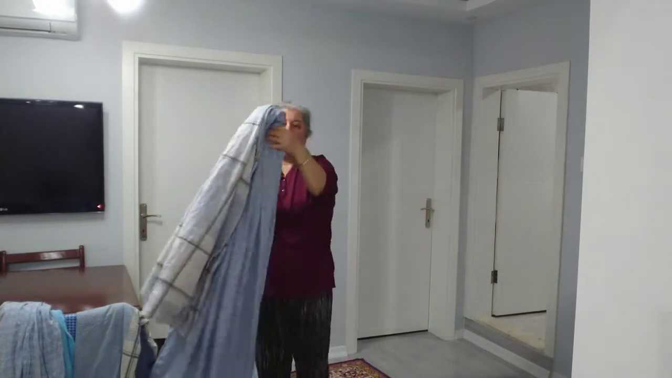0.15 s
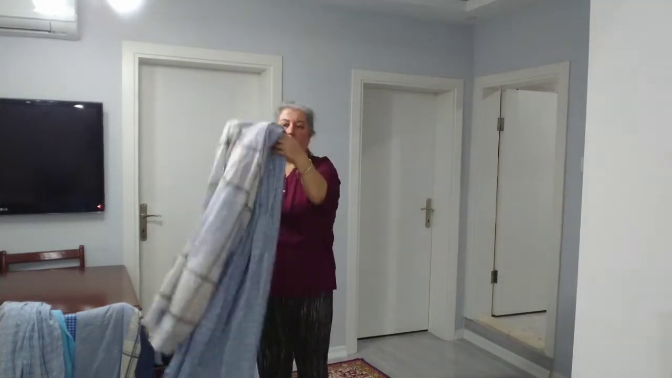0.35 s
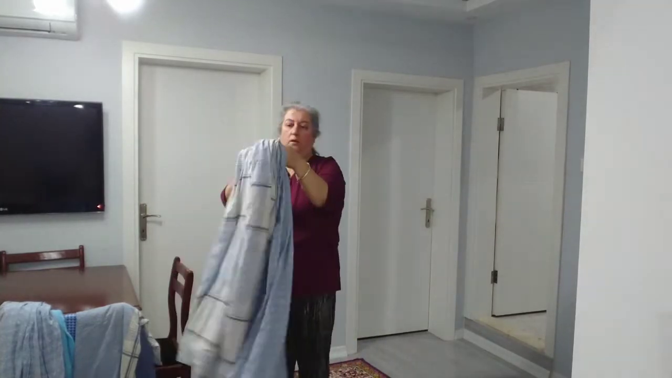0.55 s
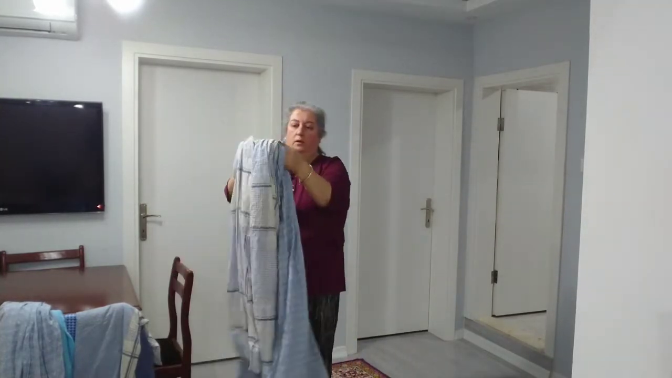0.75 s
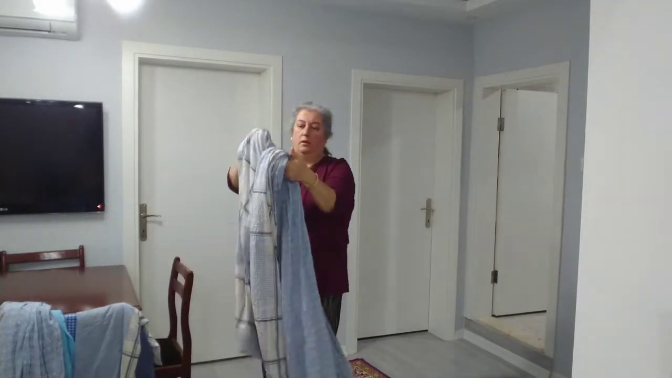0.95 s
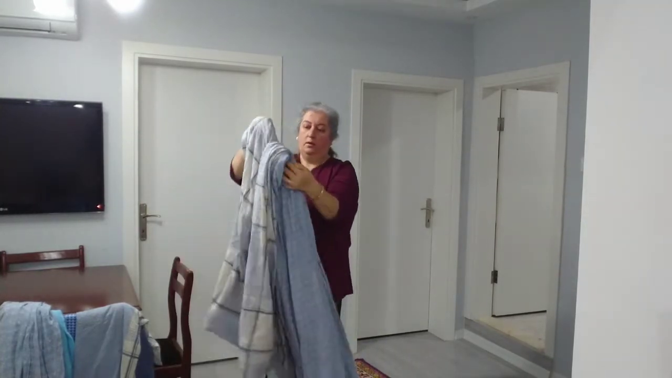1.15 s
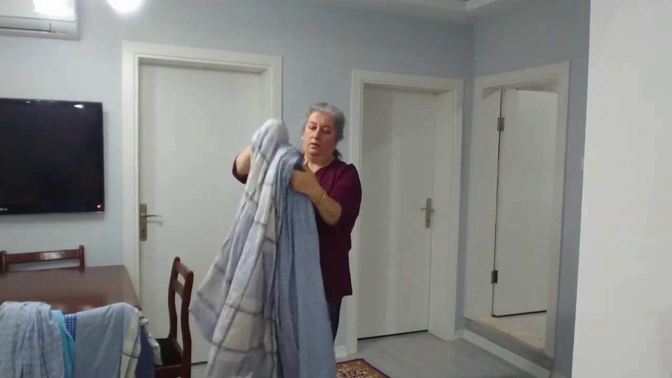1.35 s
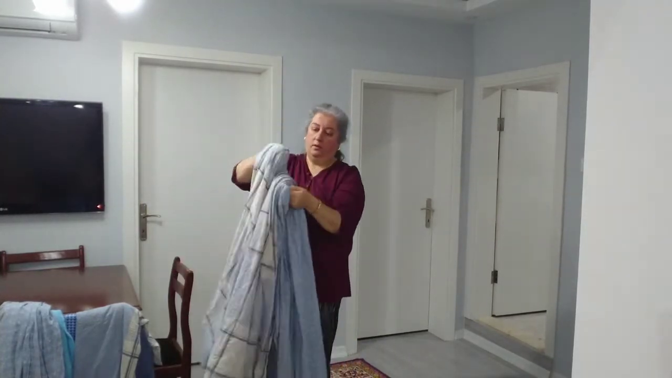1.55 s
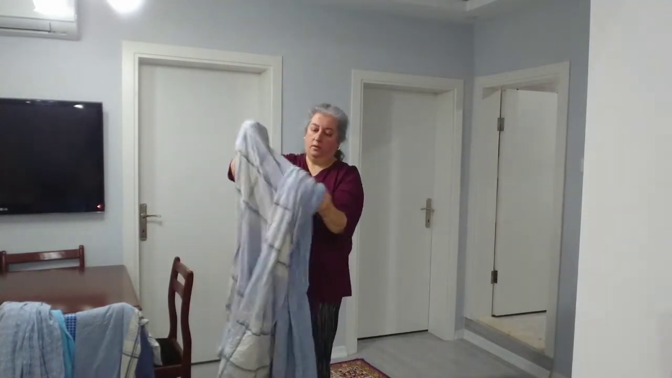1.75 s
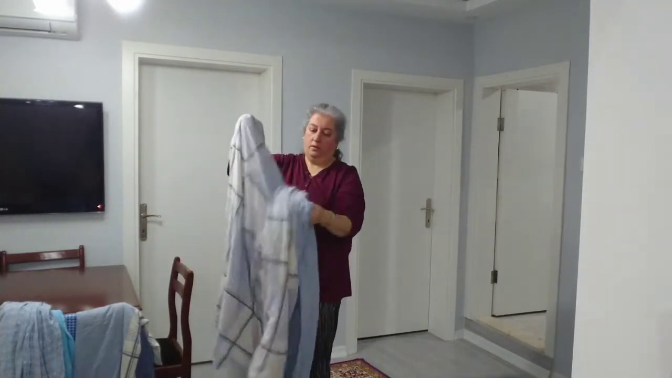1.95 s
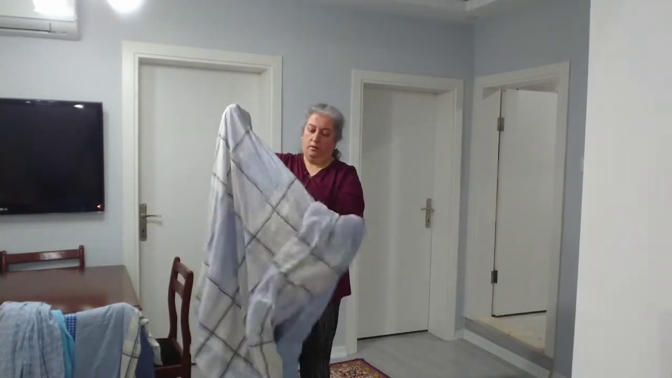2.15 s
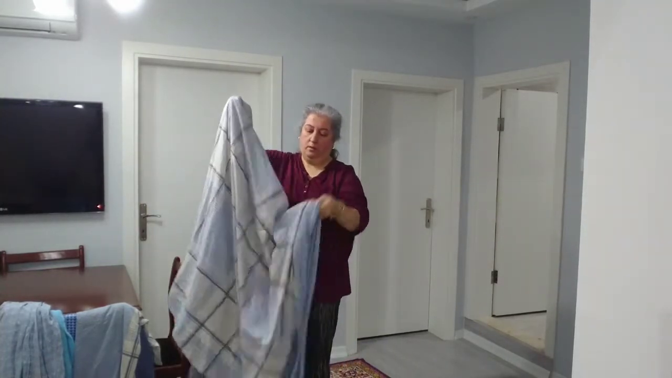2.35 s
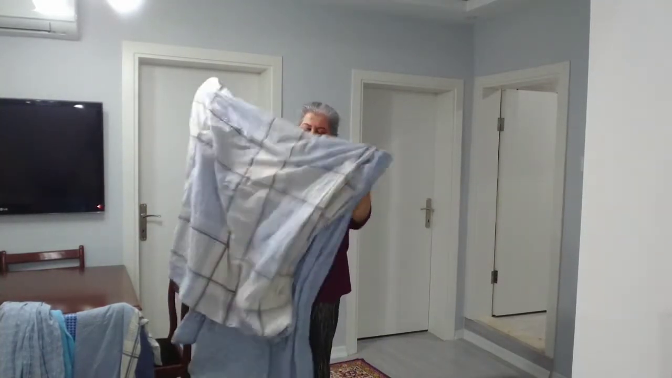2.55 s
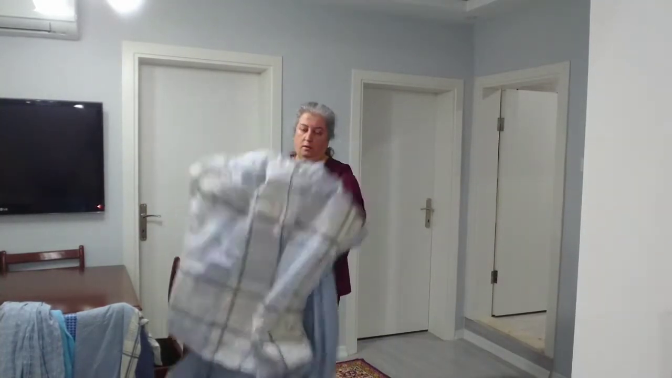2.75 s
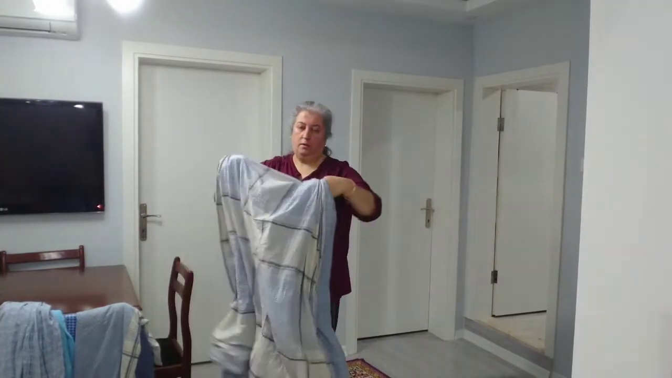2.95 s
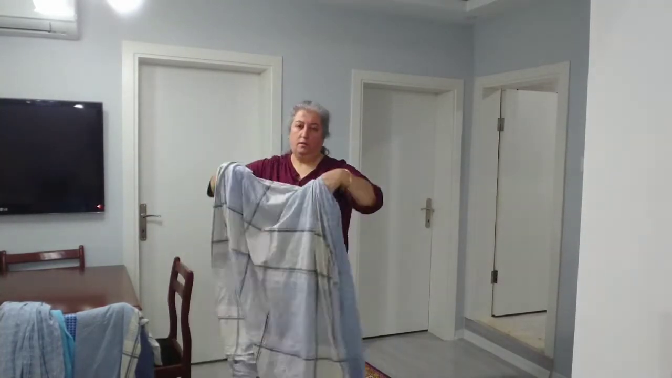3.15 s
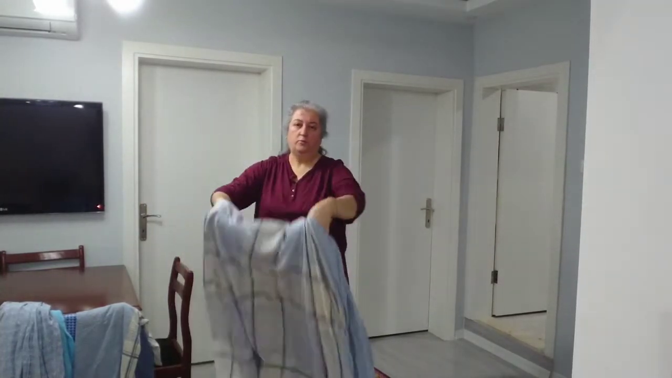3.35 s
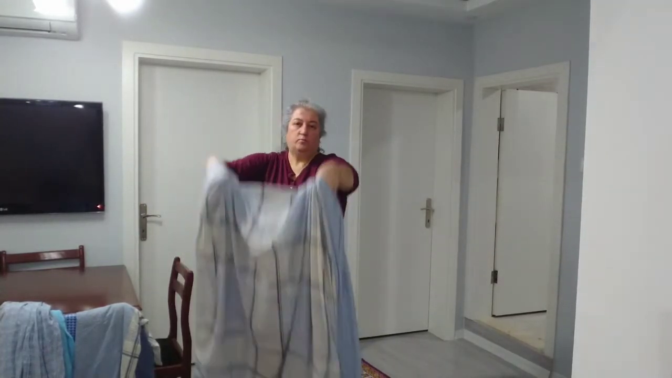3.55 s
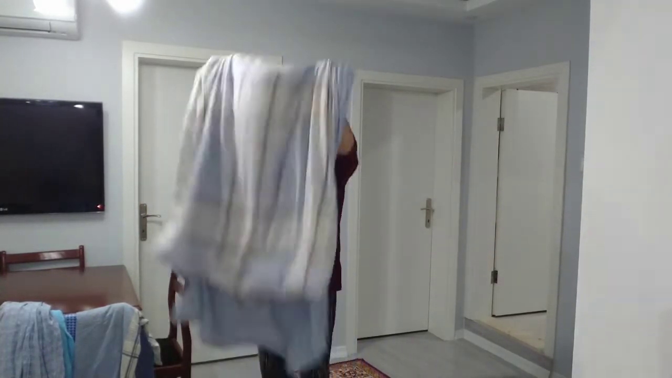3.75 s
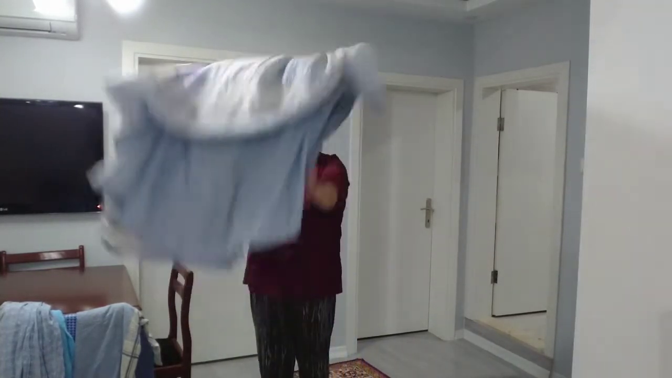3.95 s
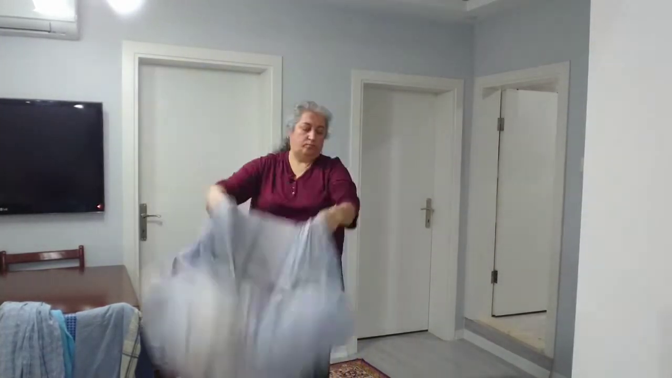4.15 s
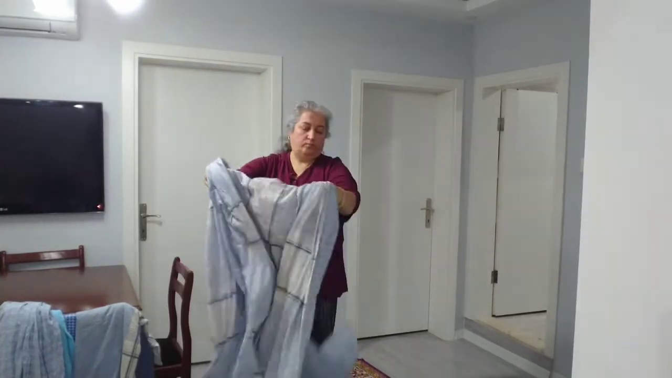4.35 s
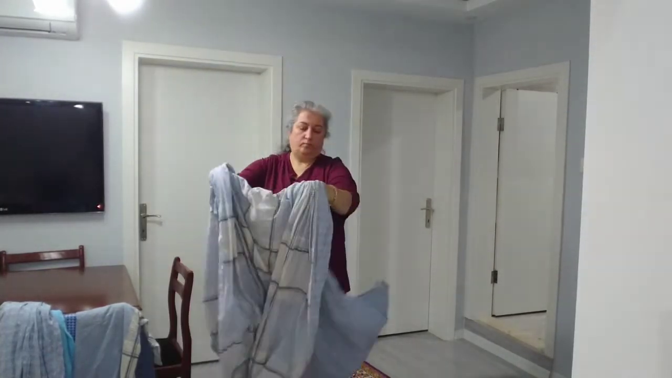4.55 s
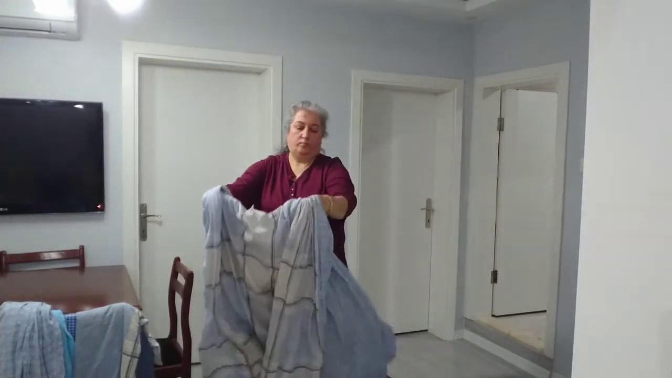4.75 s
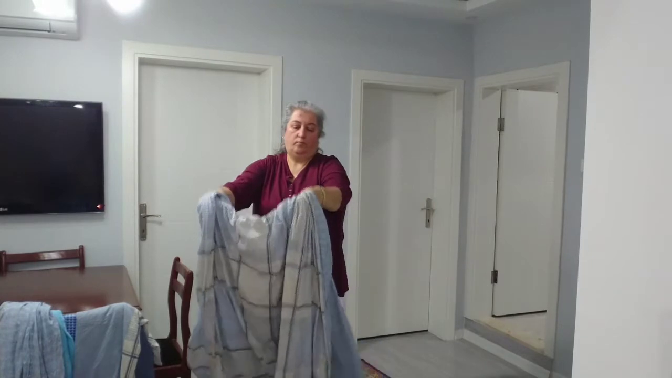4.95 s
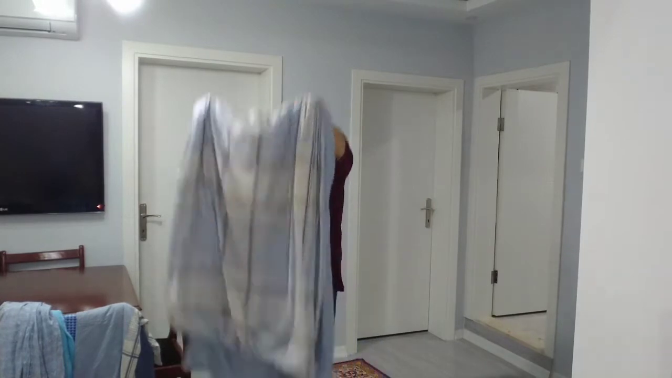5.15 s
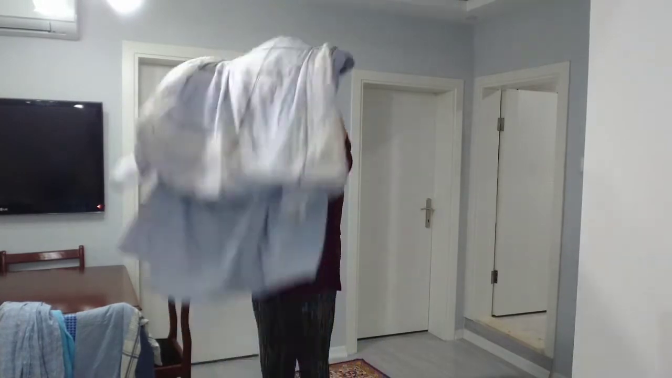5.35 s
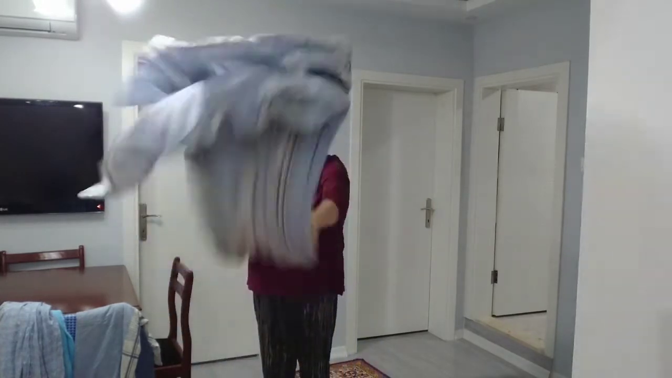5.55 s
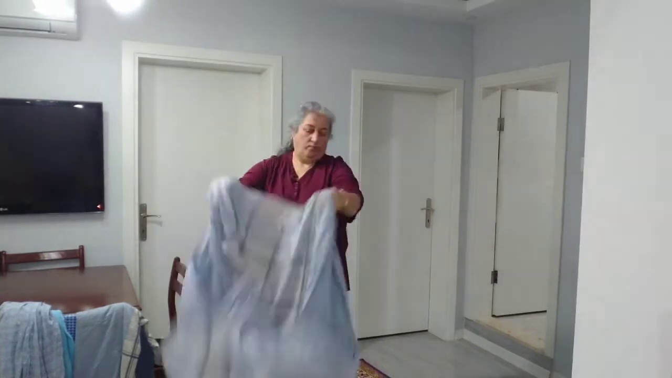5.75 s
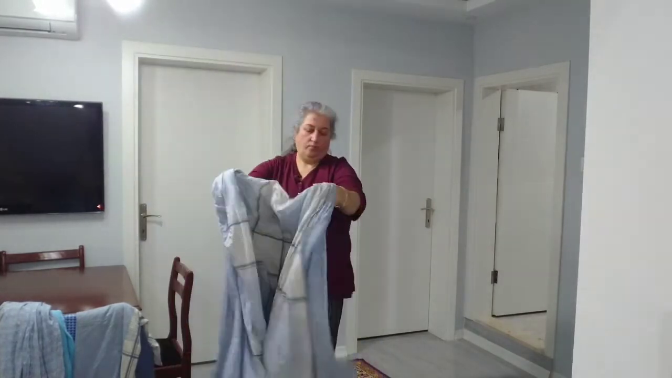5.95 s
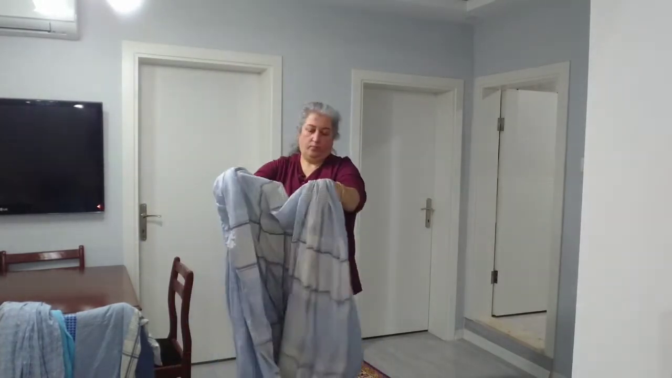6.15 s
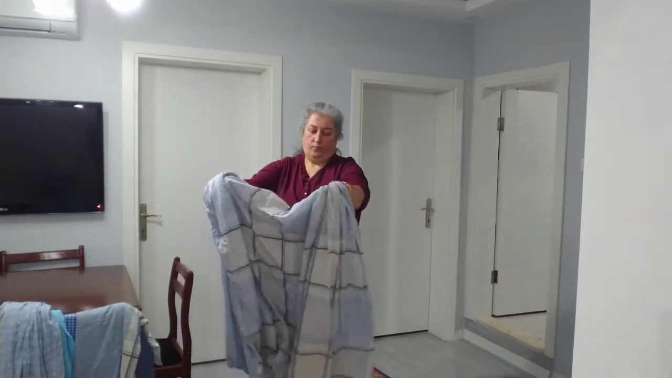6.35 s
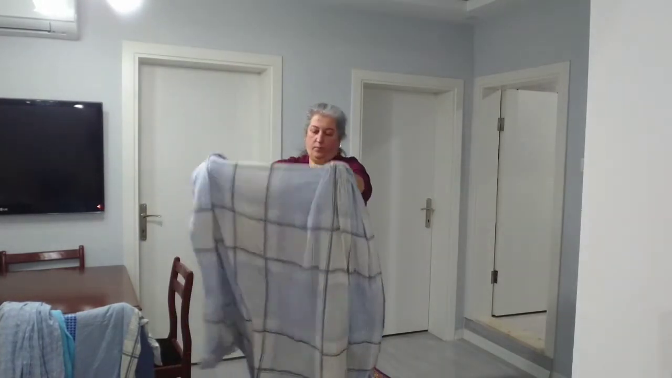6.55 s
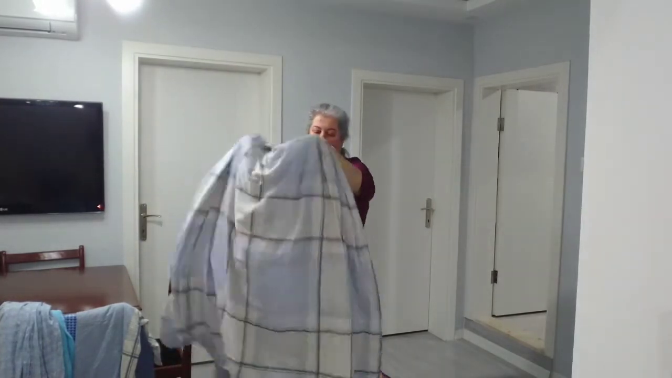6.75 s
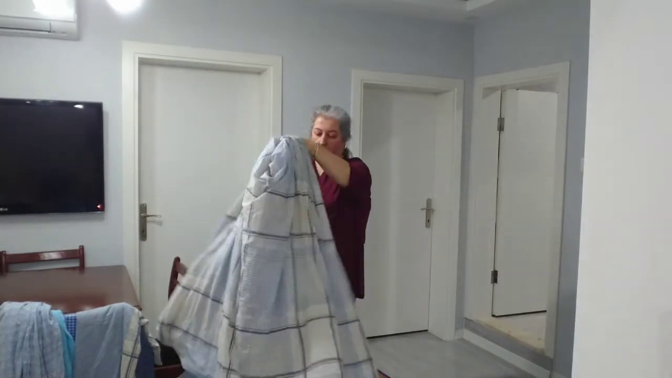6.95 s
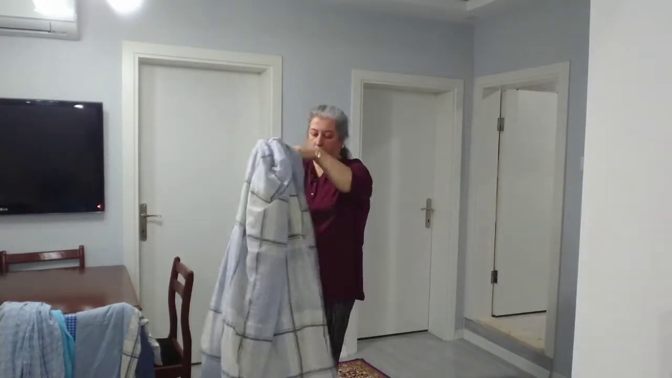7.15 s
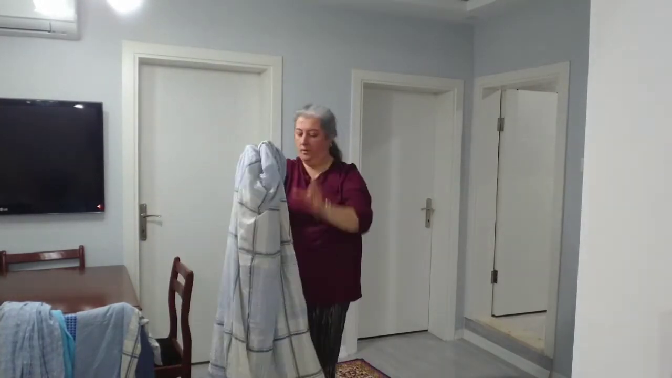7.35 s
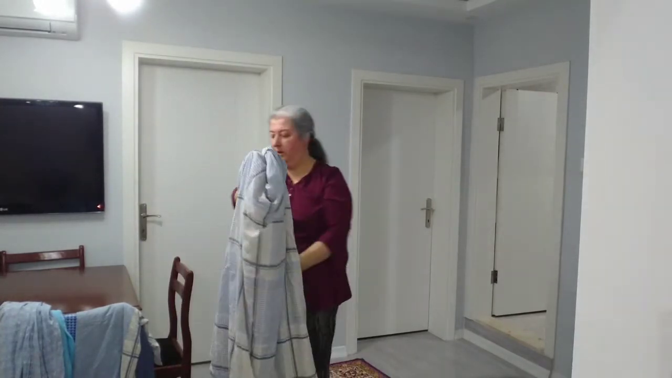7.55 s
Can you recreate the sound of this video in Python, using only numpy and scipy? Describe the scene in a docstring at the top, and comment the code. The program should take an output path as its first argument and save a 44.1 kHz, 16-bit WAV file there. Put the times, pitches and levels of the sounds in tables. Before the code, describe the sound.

A steady low hush and faint hum fill a bare, hard-walled room. From about 1.5 to 3.5 seconds, a damp bed sheet is gathered by hand, with soft rubs, swishes and small flicks, while a metal bracelet gives thin, high clinks. At 4 seconds comes the loudest sound: the sheet is shaken out in a deep, swelling whump with a sharp crack. Two smaller snaps and a billow follow as it falls, the bracelet jingles, and a corner flaps faintly at 4.5 seconds. A second, slightly softer shake whumps and cracks at 5.5 seconds, again followed by a billow and jingle. Near 6 seconds there is one tiny squeak, then a crisp flick of cloth pulled taut. Faint rustling and scattered clinks continue until about 7.5 seconds. The flaps leave a short room echo and sit slightly to the right.

```python
"""A damp bed sheet is gathered up and shaken out twice in a bare, hard-walled room.
Each shake pushes air in a swelling whump, cracks as the hem reverses and billows as it falls.
Around the shakes the cloth rubs, swishes, flicks taut and squeaks once.
Bracelet links knock and ring as the hands move, over a steady hush and a faint hum."""
import sys
import numpy as np
from scipy import signal
from scipy.fft import rfft, irfft, next_fast_len
from scipy.io import wavfile
from scipy.ndimage import uniform_filter1d

SR = 44100
rng = np.random.default_rng(int(sys.argv[2]) if len(sys.argv) > 2 else 0)


def to_wav(s):
    """Save 16-bit WAV."""
    ch = np.atleast_2d(s).T  # columns
    pcm = np.round(np.clip(ch, -1, 1) * 32767)  # PCM
    wavfile.write(sys.argv[1], SR, pcm.astype(np.int16))


N = 335452
TIME = np.arange(N) / SR

# peak_s, whump_db, fall_db_per_s, hiss_re_whump_db, lift_db, billow_db, billow_low_hz, bracelet_db
SHEET_SHAKES = [(3.987, -15, 310, -19.5, -45.5, -29.5, 34.94, -46.5),
                (5.536, -20, 166.5, -13.5, -39, -30, 100, -43)]
# Pushed air: freq_hz, density_db
AIR_SPECTRUM = [(26, -70.5), (39, -26), (50, 0.5), (75, -4.5), (112, 1), (200, -1.5), (310, -2.5),
                (440, -3.5), (620, -7), (850, -6), (1300, -9.5), (2200, -10), (5000, -13)]
# Weave hiss: freq_hz, density_db
WEAVE_SPECTRUM = [(300, -8), (1200, -1.5), (2500, 1), (4500, -6.5), (7500, -8), (11000, -20), (16000, -16)]


def sheet_shakes():
    """The sheet gathers speed and stalls: a lumpy push of air with the weave hissing on top."""
    # peak_s, level_db, rise_db_per_s, fall_db_per_s, low_hz, top_hz, hiss_re_level_db
    moves = [(4.53, -52.5, 48, 48, 65, 216, -32.5)]  # trailing corner flaps
    for s, db, fall, hiss_db, lift_db, billow_db, billow_low_hz, _ in SHEET_SHAKES:
        lift = (s - .095, lift_db, 260, 169.5, 140, 740, -9.5)
        whump = (s, db, 317, fall, 34, 1000, hiss_db)
        billow = (s + .21, billow_db, 148, 209, billow_low_hz, 680, -18)
        moves += [lift, whump, billow]
    air = ripples(AIR_SPECTRUM, per_s=220, lumpy_db=2)
    push, hiss_power = np.zeros((2, N)), np.zeros(N)
    for s, db, rise, fall, low_hz, top_hz, hiss_db in moves:
        gain = swell(s, db, rise, fall)
        # Only a spread sheet moves deep bass; only a fast one flutters brightly.
        band = signal.butter(2, [low_hz, top_hz], "band", fs=SR, output="sos")
        push += gain * unit(signal.sosfilt(band, air))
        hiss_power += (gain * amp(hiss_db)) ** 2
    return push + np.sqrt(hiss_power) * ripples(WEAVE_SPECTRUM, per_s=440, lumpy_db=.5)


# time_s, peak_db, width_ms, fizz_re_peak_db
HEM_CRACKS = [(3.968, -8.5, 0.23, -43), (3.984, -10, 0.4, -14), (3.9924, -9, .6, -32),
              (4.149, -21, .55, -15), (4.174, -20.5, .11, -10.5), (5.529, -12.5, 0.13, -11.5)]


def hem_cracks(count=3, gap_s=.0075, step_db=-5, fizz_step_db=-9, widening=1.3):
    """The hem reverses and rebounds: each time a suck and push of air and a fizz of tiny thread snaps."""
    t, pulses, fizz = TIME[:4096], np.zeros(N), np.zeros(N)
    rebound_gaps = gap_s * (.5 + rng.random((len(HEM_CRACKS), count)))
    for (s, db, width_ms, fizz_db), gaps in zip(HEM_CRACKS, rebound_gaps):
        for k, gap in enumerate(gaps):
            u = (t - t.mean()) * 1000 / (width_ms * widening ** k)
            peak = amp(db + k * step_db)
            add(pulses, s - t.mean(), peak * u * np.exp(.5 - .5 * u ** 2))
            add(fizz, s, peak * amp(fizz_db + k * fizz_step_db) * np.exp(-t / .0034))
            s += gap
    return pulses + fizz * ripples(WEAVE_SPECTRUM, per_s=1500, lumpy_db=2)


# peak_s, rub_db, ramp_s, swish_re_rub_db
HAND_STROKES = [(1.66, -60, .11, -5.5), (1.97, -58, .22, -5.5), (2.34, -56.5, .29, -12.5),
                (2.59, -56.5, .22, -7.5), (2.76, -53, .33, -12.5), (3.25, -66, .38, -7),
                (3.512, -57.5, .13, 7), (7.25, -70.5, 1.5, -7)]
# freq_hz, density_db
RUB_SPECTRUM = [(25, -40.5), (50, 1), (90, -4.5), (170, -0.5), (330, 3.5), (600, -4.5), (1200, -10),
                (2500, -21), (8000, -43)]
# freq_hz, density_db
SWISH_SPECTRUM = [(200, -17.5), (700, -0.5), (1600, -1), (3000, 1.5), (5000, -4), (8000, -6.5),
                  (11000, -18), (16000, -18.5)]


def cloth_handling(ramp_db=18.5):
    """Folds rub dully in the hands and swish where cloth slides over cloth."""
    rub_power, swish_power = np.zeros((2, N))
    for s, db, ramp_s, swish_db in HAND_STROKES:
        slope = ramp_db / ramp_s
        power = swell(s, db, slope, slope) ** 2
        rub_power += power
        swish_power += power * amp(swish_db) ** 2
    rub = np.sqrt(rub_power) * ripples(RUB_SPECTRUM, per_s=70, lumpy_db=3)
    swish = np.sqrt(swish_power) * ripples(SWISH_SPECTRUM, per_s=330, lumpy_db=4.5)
    return rub + swish


# start_s, level_db, decay_s, centre_hz, width_octaves
FOLD_FLICKS = [(1.641, -52.5, 0.02, 590, 0.83), (2.460, -51.5, 0.013, 1570, 0.21),
               (2.461, -47.5, 0.017, 3400, 0.68), (3.324, -53.5, .01, 2700, 1.46),
               (6.129, -42.5, 0.004, 420, 0.24), (6.1447, -33, 0.0053, 4020, 1.8)]


def fold_flicks():
    """A fold jerks straight: a short burst, brighter the tighter the cloth."""
    t, out = TIME[:8192], np.zeros(N)
    hz = np.fft.rfftfreq(len(t), 1 / SR) + 1
    for s, db, decay_s, centre_hz, octaves in FOLD_FLICKS:
        band = np.exp(-.5 * (np.log2(hz / centre_hz) / octaves) ** 2)
        noise = unit(irfft(rfft(rng.standard_normal(len(t))) * band))
        add(out, s, amp(db) * noise * np.exp(-t / decay_s))
    return out


def squeak(start_s=5.97, length_s=.081, pitch_hz=1530, level_db=-59):
    """One faint, wavering squeak as the sheet comes to rest."""
    size, out = int(length_s * SR), np.zeros(N)
    tone = wavering_tone(size, pitch_hz, depth=.016, smooth_samples=150)
    add(out, start_s, amp(level_db) * np.hanning(size) * tone)
    return out


# freq_hz, level_db, t60_s
LINK_MODES = [(5600, -10, 0.0035), (6580, -9, 0.0094), (8700, -1.5, 0.0075), (9133, -3.5, 0.015),
              (12330, -5.5, 0.0077), (13400, -13, .011), (14400, -8, 0.0091), (15400, -16.5, 0.013)]


def bracelet(detune=.02, spread_db=4.5, upper_hz=11000, stray_upper_db=-2):
    """Metal links knock together; each knock rings the same short modes a little differently."""
    hz, db, t60 = np.transpose(LINK_MODES)[:, :, None]
    t = TIME[:1024]
    strength, tuning, phase = rng.standard_normal((3, 40, 2, len(LINK_MODES), 1))  # 40 stereo knocks
    envelopes = amp(db + spread_db * strength - 60 * t / t60)
    rings = envelopes * np.sin(2 * np.pi * hz * (1 + detune * tuning[:, :1]) * t + np.pi * phase)
    lower = (rings * (hz <= upper_hz)).sum(2)
    upper = (rings * (hz > upper_hz)).sum(2)
    knocks = jingles(lower, upper) + stray_ticks(lower + amp(stray_upper_db) * upper)
    # Small links radiate almost nothing below their lowest mode.
    return signal.lfilter(*signal.butter(4, 5000, "high", fs=SR), knocks)


def wrist_swings(count=4, period_s=.119, length_s=.055, arch_db=-5.5, upper_db=-1.5):
    """Jingle rows: the bracelet swings after each whump, hardest on the second swing."""
    return [(s + k * period_s, db + arch_db * (k - 2) ** 2, length_s, upper_db)
            for s, *_, db in SHEET_SHAKES for k in range(1, count + 1)]


# start_s, level_db, length_s, upper_modes_db
LINK_JINGLES = [(1.745, -40, 0.0021, 8), (1.971, -58, 0.036, -1), (2.153, -44, 0.0069, -1),
                (2.160, -42.5, 0.0089, -2), (2.572, -47, 0.037, -1), (2.89, -49.5, 0.0055, -3),
                (3.174, -56.5, 0.042, 1), (3.861, -37, .032, -3.5), (5.223, -53, 0.091, -4.5),
                (6.144, -41.5, 0.0048, -9), (6.692, -50, .035, -8), (6.878, -63.5, 0.056, -8),
                (7.095, -57.5, 0.0047, -10), (7.248, -50, 0.0068, -10), (7.272, -51.5, 0.011, -9.5),
                (7.444, -55, 0.035, -9)]


def jingles(lower, upper, knocks_per_s=550, uneven_db=1.5, first_db=11, soften_db_per_s=240):
    """Links collide in clusters: a short clink opens hard, a long slither softly."""
    rows, out = LINK_JINGLES + wrist_swings(), np.zeros((2, N))
    for (s, db, length_s, upper_db), draws in zip(rows, rng.random((len(rows), 100, 3))):
        knocks = lower + amp(upper_db) * upper
        cluster = np.zeros((2, SR // 4))
        opening_db = first_db - soften_db_per_s * length_s
        for k, (when, size, link) in enumerate(draws[:3 + int(knocks_per_s * length_s)]):
            force = knock_force(size, uneven_db) if k else amp(opening_db)
            add(cluster, when * length_s if k else 0, force * knocks[int(link * len(knocks))])
        duty = (length_s + .01) * SR / cluster.shape[1]
        add(out, s, amp(db) * unit(cluster) * np.sqrt(duty))
    return out


# time_s, level_db
TICK_ENVELOPE = [(.95, -99), (1.1, -71.5), (1.55, -80.5), (1.9, -62.5), (2.36, -76), (2.54, -55),
                 (2.72, -79), (3.55, -74), (3.83, -58), (4.65, -89.5), (5.1, -91.5), (5.45, -57.5),
                 (6.1, -74.5), (7.6, -72)]


def stray_ticks(knocks, ticks_per_s=130, uneven_db=6):
    """Loose links knock singly at random while the hands are busy."""
    out = np.zeros((2, N))
    for when, size, link in rng.random((int(ticks_per_s * N / SR), 3)):
        add(out, when * N / SR, knock_force(size, uneven_db) * knocks[int(link * len(knocks))])
    return unit(out) * amp(np.interp(TIME, *np.transpose(TICK_ENVELOPE)))


# freq_hz, gain_db, t60_s
STANDING_WAVES = [(51, -61, 0.6), (103, -60, .35), (156.8, -61, .6), (224.3, -64, .6), (405, -61, 0.28),
                  (538, -63, 0.3)]


def room_boom(x):
    """Moving air sets the room's standing waves ringing."""
    t = TIME[:SR]
    ring = sum(amp(db - 60 * t / t60) * np.cos(2 * np.pi * hz * t) for hz, db, t60 in STANDING_WAVES)
    return x + signal.fftconvolve(x, ring[None], axes=1)[:, :N]


# freq_hz, t60_s
ROOM_DECAY = [(60, 0.1), (200, 1.22), (500, 0.4855), (2000, 0.72), (5000, 0.88), (9000, 0.42),
              (15000, 0.49)]
# freq_hz, gain_db
REFLECTION_EQ = [(80, -10.5), (250, -4.5), (700, 2)]


def room(x, tail_db, early_db, early_per_s=1500, early_decay_s=.022):
    """Direct sound, early wall reflections and a tail that dies band by band; gain about one."""
    t = TIME[:SR]
    noise = diffuse(rng.standard_normal((2, SR))) * (t > .004)
    hz, frame_s, bands = signal.stft(noise, SR, nperseg=256)
    decay = amp(-60 * frame_s / lookup(ROOM_DECAY, hz)[:, None])
    tail = signal.istft(bands * decay, SR, nperseg=256)[1][:, :SR]
    taps = rng.standard_normal((2, SR)) * (rng.random(SR) < early_per_s / SR)
    early = diffuse(taps) * (t > .001) * np.exp(-t / early_decay_s)
    reflections = amp(tail_db) * unit(tail) + amp(early_db) * unit(early)
    response = colour(reflections, REFLECTION_EQ)[:, :SR] / np.sqrt(SR)
    response[:, 0] += 1
    return signal.fftconvolve(np.atleast_2d(x), unit(response) / np.sqrt(SR), axes=1)[:, :N]


# freq_hz, density_db
HUSH_SPECTRUM = [(22, -44.5), (36, -17.5), (50, -1.5), (72, -9.5), (112, -13.5), (145, -2), (190, -7.5),
                 (300, -1), (390, -0.5), (520, -9), (1550, -14), (2450, -11.5), (4500, -22.5),
                 (15000, -35.5)]


def room_tone(hush_db=-60.9, hum_db=-76.4, hum_hz=149, left_db=-5.4, left_lag_s=.00038):
    """Steady hush and an unsteady hum come from the right, reaching the left late and weaker."""
    hush = unit(colour(diffuse(rng.standard_normal((2, N)), share=.79), HUSH_SPECTRUM))
    hum = unit(wavering_tone(N, hum_hz, depth=.012, smooth_samples=3000))
    left, right = amp(hush_db) * hush + amp(hum_db) * hum
    return np.array([amp(left_db) * np.roll(left, round(left_lag_s * SR)), right])


# freq_hz, coherence_ratio
STEREO_COHERENCE = [(40, 1), (130, .993), (290, .95), (640, .72), (1400, .3), (3100, .25), (7000, .05)]


def diffuse(noises, share=1):
    """Diffuse field from two noises: channels alike in the bass, unrelated in the treble."""
    a, b = rfft(noises)
    hz = np.fft.rfftfreq(noises.shape[1], 1 / SR)
    same = np.clip(share * lookup(STEREO_COHERENCE, hz), 0, 1)
    return irfft(np.array([a, same * a + np.sqrt(1 - same ** 2) * b]), noises.shape[1])


def ripples(spectrum, per_s, lumpy_db):
    """Cloth noise from a wide surface, one lump per ripple running through the sheet."""
    knots = rng.standard_normal(N // 20)
    lumps = np.interp(TIME * per_s, np.arange(len(knots)), np.clip(knots, -2, 2))
    noise = diffuse(rng.standard_normal((2, next_fast_len(N))))[:, :N]
    return unit(colour(noise * amp(lumpy_db * lumps), spectrum))


def swell(peak_s, peak_db, rise_db_per_s, fall_db_per_s):
    """Gain of a movement that gathers speed, then dies away."""
    return amp(peak_db - np.maximum((peak_s - TIME) * rise_db_per_s, (TIME - peak_s) * fall_db_per_s))


def wavering_tone(size, pitch_hz, depth, smooth_samples):
    """Sine with random pitch drift."""
    drift = unit(uniform_filter1d(rng.standard_normal(size), smooth_samples))
    return np.sin(2 * np.pi * np.cumsum(pitch_hz * (1 + depth * drift)) / SR)


def knock_force(draw, uneven_db):
    """Uniform draw to gain: many soft knocks, few hard."""
    return amp(uneven_db * min(-np.log(1 - draw), 3))


def colour(x, spectrum):
    """Filter by rows of freq_hz, gain_db."""
    size = next_fast_len(N + SR // 4)
    gain = amp(lookup(spectrum, np.fft.rfftfreq(size, 1 / SR)))
    return irfft(rfft(x, size) * gain, size)[..., :N]


def lookup(table, hz):
    """Interpolate over log frequency."""
    freq_hz, value = np.transpose(table)
    return np.interp(np.log(hz + 1), np.log(freq_hz + 1), value)


def add(mix, start_s, sound):
    """Mix in place."""
    part = mix[..., round(start_s * SR):][..., :sound.shape[-1]]
    part += sound[..., :part.shape[-1]]


def amp(db):
    """Decibels to gain."""
    return 10 ** (np.asarray(db) / 20)


def unit(x):
    """Unit rms per channel."""
    return x / np.sqrt(np.mean(x ** 2, axis=-1, keepdims=True) + 1e-20)


# freq_hz, left_minus_right_db
STEREO_BALANCE = [(60, -4.7), (200, -4.6), (600, -3.4), (1300, -4.4), (4400, -3.5), (8000, 0), (15000, 1)]


def scene():
    """Sheet and bracelet in the room, bass and mids stronger on the right, over the room tone."""
    mix = room(room_boom(sheet_shakes()), tail_db=-9, early_db=-7)
    mix += room(room_boom(hem_cracks()), tail_db=-7.5, early_db=-5.5)
    mix += room(cloth_handling(), tail_db=-8, early_db=-5.5)
    mix += room(fold_flicks() + squeak(), tail_db=-3, early_db=-2.5)
    mix += amp(1.5) * room(bracelet(), tail_db=-2, early_db=-12)
    left = colour(mix[0], [(hz, db / 2) for hz, db in STEREO_BALANCE])
    right = colour(mix[1], [(hz, -db / 2) for hz, db in STEREO_BALANCE])
    return np.array([left, right]) + room_tone()


def record(dry):
    """Steep low-pass at 15.8 kHz."""
    lowpass = signal.firwin(401, 15800, window=("kaiser", 9), fs=SR)
    return signal.oaconvolve(dry, lowpass[None], "same")


dry = scene()
out = record(dry)
to_wav(out)
```